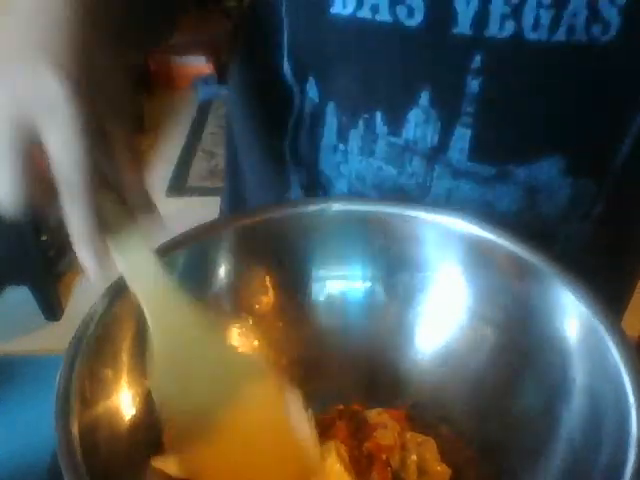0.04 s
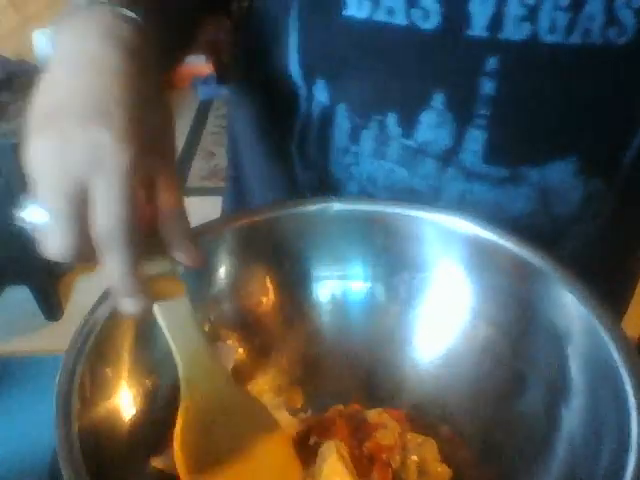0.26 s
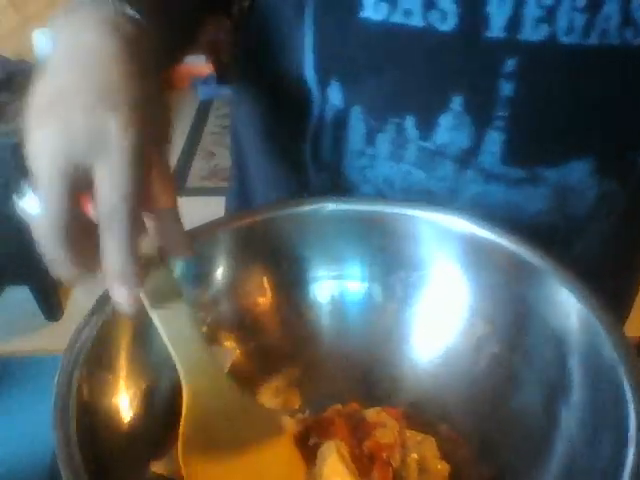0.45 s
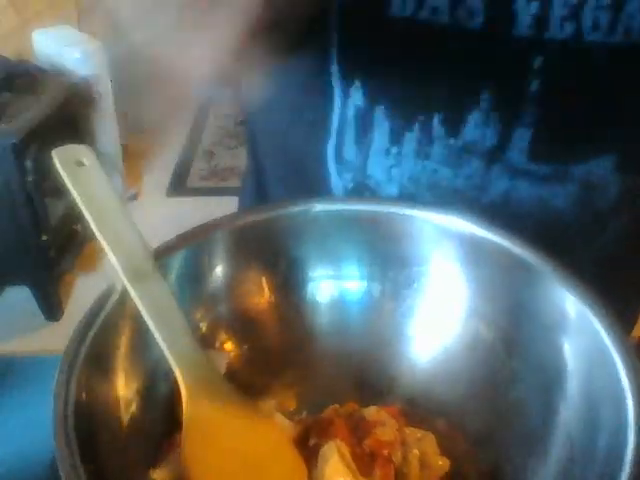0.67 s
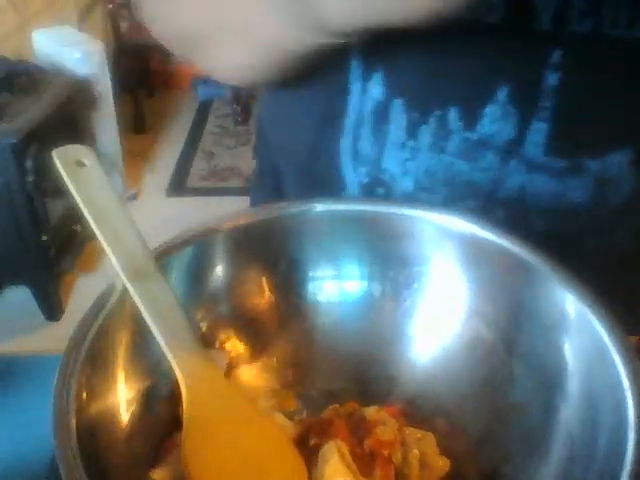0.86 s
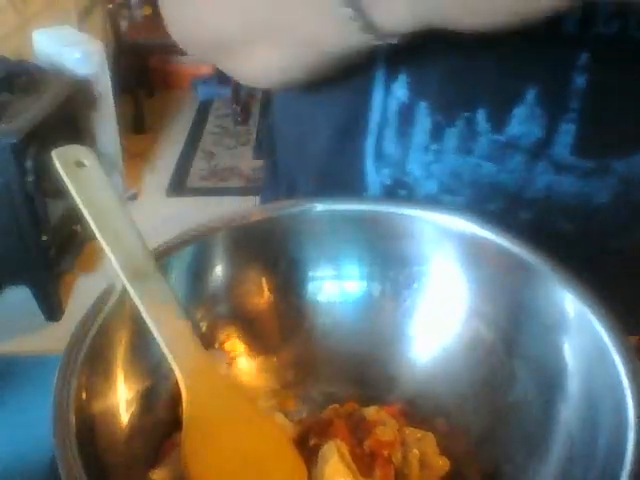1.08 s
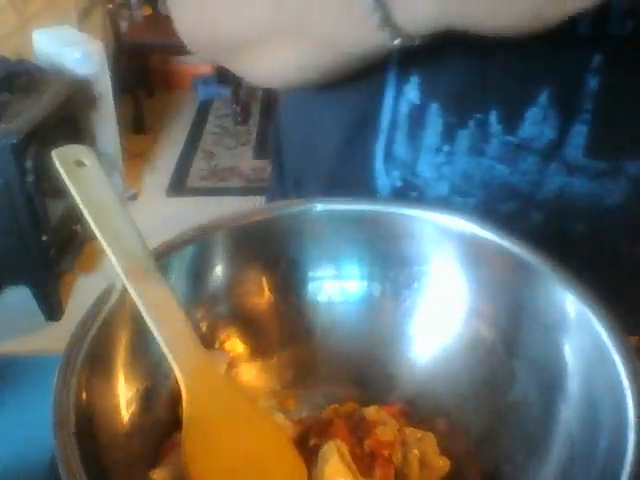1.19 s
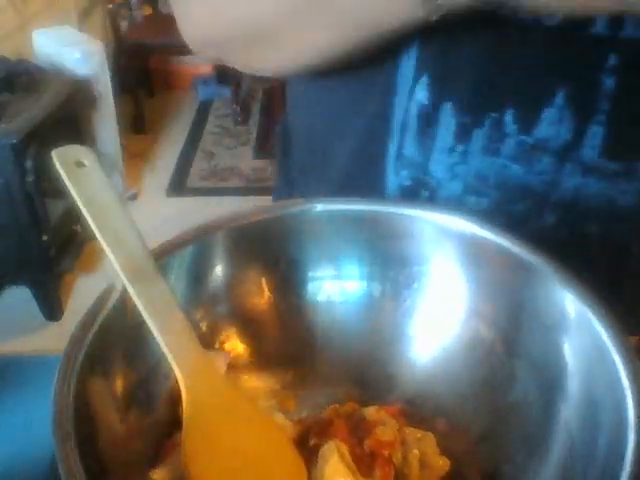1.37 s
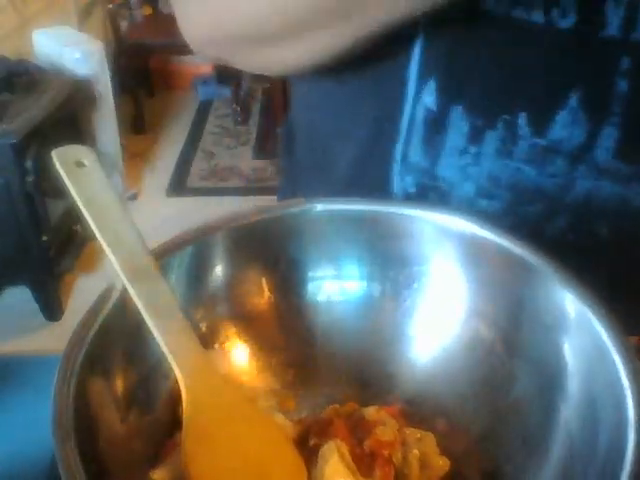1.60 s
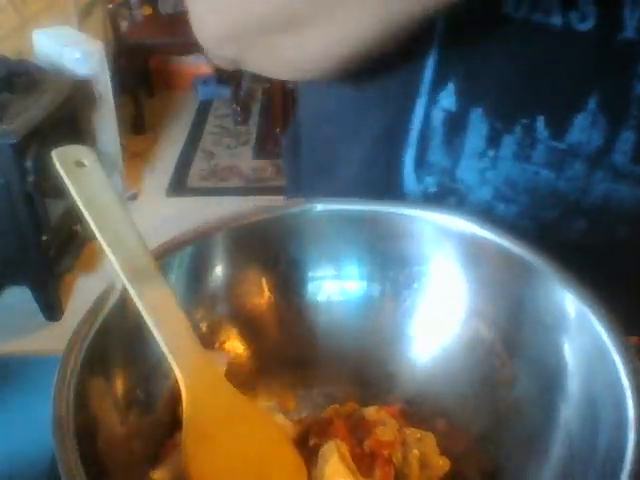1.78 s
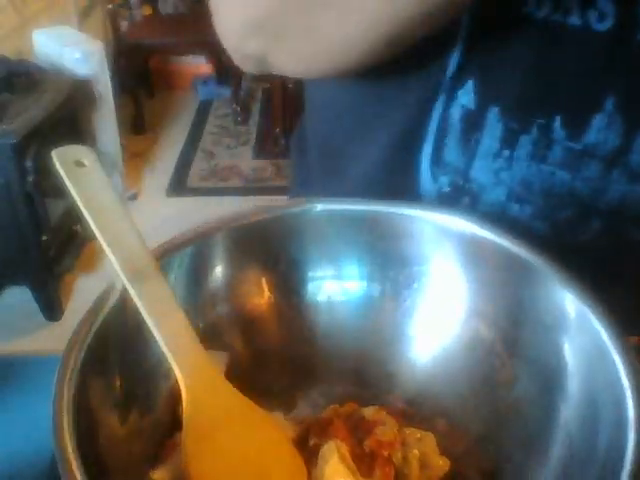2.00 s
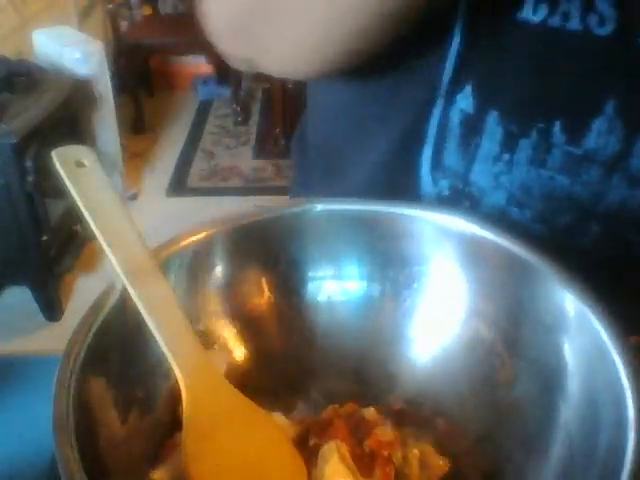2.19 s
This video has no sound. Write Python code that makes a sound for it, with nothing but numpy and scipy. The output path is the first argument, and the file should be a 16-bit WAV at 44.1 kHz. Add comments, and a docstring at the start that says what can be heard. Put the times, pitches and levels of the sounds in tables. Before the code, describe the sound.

A steel mixing bowl clangs under food and a spoon, rings on, then plastic crinkles nearby.

```python
"""A steel mixing bowl clangs close by as food and a wooden spoon land in it; then its rim rings on.
Each blow is a short clatter that sets off decaying modes; rocking adds bumps and a brief hum.
The food thuds as shaped noise, and the spoon scrapes as tiny slips that ring the bowl's wall.
Beside it a container is handled: dry knocks with short modes, and a crinkle of plastic made of clicks.
A short diffuse kitchen tail follows every source, over a faint rumble and hiss of noise."""
import sys
import numpy as np
from scipy import signal
from scipy.fft import rfft, irfft
from scipy.io import wavfile

SR = 44100
rng = np.random.default_rng(int(sys.argv[2]) if len(sys.argv) > 2 else 0)


def transcribe(u):
    """Save the signal u as a 16-bit wav file named by the first command-line argument.

    u: samples, shape (n,) or (channels, n), limited to [-1, 1]; the rate is SR.
    q: integer samples, one column per channel.
    """
    v = np.clip(np.atleast_2d(u).T, -1, 1)
    q = np.round(v * 32767).astype(np.int16)
    wavfile.write(sys.argv[1], SR, q)


N = 99225
TIME = np.arange(N) / SR
CUTOFF_HZ = 16200

# Ringing modes of the bowl: the wall is damped by the food, the rim rings long.
# Each row: frequency in Hz, level in dB, time to fall 60 dB in s (before any later damping).
BOWL_MODES = [ (402, -51, .36), (503, -41, .15), (912, -51.5, 0.24), (1082, -56, 0.6), (1220, -52.5, .16),
              (1327, -46.5, 0.16), (1380, -78.5, 1.6), (1428.6, -37, 0.09), (1517, -54.5, .15),
              (1653, -70.5, 2.4), (1738, -43.5, .15), (1970, -65.5, 1), (2347, -69.5, 2.96),
              (2468, -48, 0.44), (2671, -33, .23), (2760, -63, 2.3), (2947, -44, .3), (3058, -29, .17),
              (3155, -72.5, 1.1), (3542, -44, .25), (3950, -52.5, 1.2), (4127, -30, 0.11), (4300, -56, 1.6),
              (4577, -62.5, 1.6), (4759, -38, .2), (4824, -52, 1.2), (5090, -56.5, 2.4), (5304, -51, .6),
              (5354, -34, 0.097), (5900, -58, .5), (6080, -66, .8), (6450, -38, .22)]


def amp(db):
    """Decibels to gain."""
    return 10 ** (np.asarray(db) / 20)


def unit(x):
    """Scales to rms 1."""
    return x / np.sqrt(np.mean(x ** 2) + 1e-20)


def decay(t60):
    """An envelope that falls 60 dB in t60 seconds."""
    return np.exp(-np.log(1000) * TIME / t60)


def over_hz(points, hz):
    """Reads (Hz, value) points on a log-frequency axis."""
    point_hz, value = np.transpose(points)
    return np.interp(np.log(hz + 1), np.log(point_hz + 1), value)


def add(mix, start_s, sound):
    """Mixes a sound in at start_s seconds, cut at the end of the mix."""
    part = mix[round(start_s * SR):]
    part += sound[:len(part)]


def coloured(x, points, size=4096):
    """Causal minimum-phase filter with the given (Hz, dB) curve."""
    hz = abs(np.fft.fftfreq(size, 1 / SR))
    log_gain = np.log(amp(over_hz(points, hz)))
    # the Hilbert transform of the log gain supplies the minimum phase
    response = np.exp(np.conj(signal.hilbert(log_gain)))
    taps = np.fft.ifft(response).real
    return signal.oaconvolve(x, taps[:size // 2])[:N]


def band_curve(bands_hz, colour, sub_db=-20, top_db=-12):
    """A colour given at some bands, falling away below and above them."""
    bottom = (20, colour[0] + sub_db)
    top = (CUTOFF_HZ, colour[-1] + top_db)
    return [bottom, *zip(bands_hz, colour), top]


def at_level(x, points):
    """Makes a sound follow an (s, dB) curve; silent outside it."""
    s, db = np.transpose(points)
    inside = (TIME >= s[0]) * (TIME <= s[-1])
    return unit(x) * amp(np.interp(TIME, s, db)) * inside


def ring(modes):
    """Free ringing: a decaying sine for each (Hz, dB, t60) mode."""
    return sum(amp(db) * decay(t60) * np.sin(2 * np.pi * hz * TIME) for hz, db, t60 in modes)


def even_noise(size=256):
    """Noise whose short-time spectrum is kept fairly even, like many crowded modes."""
    x = rng.standard_normal(N)
    for _ in range(2):
        spectrum = signal.stft(x, nperseg=size)[2]
        # keep the phases, level every magnitude
        x = signal.istft(np.exp(1j * np.angle(spectrum)), nperseg=size)[1][:N]
    return x


def contact(click_db, t60, half_s=1e-5):
    """A brief push at the start of a dense, quickly dying clatter."""
    clatter = even_noise() * decay(t60)
    push = np.exp(-(TIME / half_s - 2) ** 2)
    return clatter / np.linalg.norm(clatter) + amp(click_db) * push / push.sum()


def grains(per_s, spread_db):
    """Tiny clicks of uneven size and random sign at random moments."""
    spread = np.minimum(rng.exponential(1, N), 4)
    sizes = amp(spread_db * spread) * rng.choice([-1, 1], N)
    return sizes * (rng.random(N) < per_s / SR)


def background():
    """Two filtered noises: a steady low room rumble and a thin hiss that swells and sinks."""
    # Spectra of the rumble and the hiss. Each row: frequency in Hz, relative level in dB per Hz.
    rumble_colour = [(20, -9), (50, 0.5), (110, 0.5), (190, 4), (300, -5), (600, -11.5), (1500, -16.5),
                     (4000, -24.5), (16000, -41.5)]
    hiss_colour = [(20, -17.5), (4000, -5.5), (7500, -6.5), (9800, 4), (11500, -7), (14000, 6), (16000, -5)]
    # Swell of the hiss. Each row: time in seconds, level in dB.
    hiss_level = [(0, -87), (.14, -78), (.18, -67), (.55, -65.5), (.75, -72.5), (1.12, -73.5), (1.2, -69),
                  (1.45, -74.5), (1.65, -64), (1.85, -75), (2.02, -69), (2.25, -77)]
    rumble_db = -72.5
    rumble, hiss = rng.standard_normal((2, N))
    hiss_gain = amp(np.interp(TIME, *np.transpose(hiss_level)))
    rumble = amp(rumble_db) * unit(coloured(rumble, rumble_colour))
    return rumble + hiss_gain * unit(coloured(hiss, hiss_colour))


def wavering(size=2048):
    """A gain that drifts at random around 1, from low-passed noise."""
    waver_db, waver_hz = 1.7, 20  # rms depth, speed limit
    hz = np.fft.rfftfreq(size, N / SR / size)
    spectrum = rfft(rng.standard_normal(size)) / (1 + (hz / waver_hz) ** 2)
    drift = unit(irfft(spectrum))
    return amp(waver_db * np.interp(np.arange(N) / N, np.arange(size) / size, drift))


def shimmer(count=90):
    """A crowd of weak modes scattered between the bowl's strong ones."""
    # Strength of the crowd. Each row: frequency in Hz, level of each mode in dB.
    shimmer_level = [(700, -74), (1500, -81), (2100, -70), (3300, -75.5), (4500, -64.5), (5300, -64.5),
                     (6200, -67), (7000, -76)]
    # Ringing time of the crowd. Each row: frequency in Hz, time to fall 60 dB in s.
    shimmer_t60 = [(700, 0.17), (1600, 0.86), (3300, .8), (4500, 0.42), (5300, 0.82), (7000, 0.41)]
    edges = np.linspace(shimmer_level[0][0], shimmer_level[-1][0], count + 1)
    hz = edges[:-1] + rng.random(count) * np.diff(edges)
    modes = zip(hz, over_hz(shimmer_level, hz), over_hz(shimmer_t60, hz))
    signs = rng.choice([-1, 1], count)
    return sum(sign * ring([mode]) for sign, mode in zip(signs, modes))


def bowl():
    """Each blow clatters and rings the steel's modes, with its own balance of thump, clang and ring."""
    # Centres of a blow's colour in Hz: thump, low, body, clang, hollow, ring, edge, air.
    bands_hz = [90, 380, 850, 1500, 2100, 3400, 6300, 9500]
    # Blows on the bowl. Each row: start in seconds, contact click in dB, ringing in dB,
    # clatter time to fall 60 dB in s, colour in dB at the bands above.
    blows = [ (0.16, -20.5, -8, .19, (6.5, -5, 2.5, -11.5, -4, 4, 4.5, -17.5)),
             (0.2293, -2, -18, 0.089, (-2.5, 9.5, 19.5, 2.5, -9.5, -8.5, -14.5, -20.5)),
             (.2697, -9.5, -20.5, .045, (-2, 3, -3.5, 21.5, -11.5, 16.5, -21.5, -27)),
             (0.2982, -10, -9.5, 0.088, (2.5, 5, 7.5, 1, -10, -11, -18.5, -27)),
             (0.4783, -7, 0.5, 0.16, (11.5, 11, 16, 23.5, 9, 14, 5.5, -22.5))]
    twin_hz, twin_share = 2, 0.072  # twin's offset in Hz, its share of the mode's amplitude
    wood_contact_s = .00006  # half-length of the spoon's contact with the steel
    damped_s, damped_fade_s = 1.41, 0.48  # start and time constant of the extra damping

    modes = shimmer()
    for hz, db, t60 in BOWL_MODES:
        # the bowl is not quite round: each mode beats with a close twin
        twin = twin_share * ring([(hz + twin_hz, db, t60)])
        modes += wavering() * (ring([(hz, db, t60)]) - twin)

    out = np.zeros(N)
    for start_s, click_db, ring_db, t60, colour in blows:
        blow = contact(click_db, t60, wood_contact_s) + amp(ring_db) * modes
        add(out, start_s, coloured(blow, band_curve(bands_hz, colour)))
    # the last of the ring dies faster
    return out * np.exp(-np.maximum(TIME - damped_s, 0) / damped_fade_s)


def food_and_spoon():
    """The food settles with a thud while the spoon slides down the steel in tiny slips that ring the wall."""
    # Swell of the thud, then of the scrape. Each row: time in seconds, level in dB.
    thud_level = [(.16, -72), (.19, -50.5), (.225, -48), (.26, -49), (.3, -51.5), (.35, -73.5)]
    scrape_level = [(.17, -81.5), (.205, -40.5), (.225, -42.5), (.26, -44), (.3, -47), (.34, -56.5),
                    (.38, -64.5), (.41, -65.5), (.437, -50), (0.462, -63.5), (.48, -84.5)]
    # Tone of the thud, then of the scrape. Each row: frequency in Hz, gain in dB.
    thud_colour = [(20, -15.5), (45, -10), (75, 2.5), (120, -7), (200, -16.5), (500, -39), (2000, -70)]
    scrape_colour = [(100, -10.5), (600, 6.5), (1400, 4), (2000, -8.5), (2600, 0.5), (3600, -1.5),
                     (5400, -15.5), (6250, -0.5), (7500, -2), (10000, -19), (16000, -20.5)]
    wall_db, wall_t60 = 3.5, .12  # how strongly and how long (s) the slips ring the wall

    thud = at_level(coloured(even_noise(size=2048), thud_colour), thud_level)
    slips = grains(per_s=3000, spread_db=-3)
    wall = ring([(hz, db, wall_t60) for hz, db, _ in BOWL_MODES])
    scrape = slips + amp(wall_db) * signal.fftconvolve(slips, wall)[:N]
    return thud + at_level(coloured(scrape, scrape_colour), scrape_level)


def bowl_base():
    """The bowl bumps as it rocks on the counter; tipped by the spoon, it hums until it sits flat."""
    # Modes of the hum. Each row: frequency in Hz, level in dB, time to fall 60 dB in s (before seating).
    hum_modes = [(135, -54.5, 1.6), (757, -39.5, .75), (2467, -54, .9)]
    # Bumps of the rocking base. Each row: start in seconds, level in dB.
    rocks = [(0.2597, -7.5), (0.482, -4.5), (0.4962, -2.5), (0.5074, 0.5), (0.518, -5)]
    # Tone of a bump. Each row: frequency in Hz, gain in dB.
    rock_colour = [(30, -12), (80, 4), (250, 4), (600, 11.5), (1400, -0.5), (2200, -12), (6000, -20),
                   (16000, -44)]
    tipped_s, seated_s, seat_fade_s = .298, .5, .03  # hum starts, fade starts, fade time constant

    out = np.zeros(N)
    add(out, tipped_s, ring(hum_modes))
    out *= np.exp(-np.maximum(TIME - seated_s, 0) / seat_fade_s)
    for start_s, db in rocks:
        bump = contact(click_db=-3.0, t60=.035)
        add(out, start_s, amp(db) * coloured(bump, rock_colour))
    return out


def container():
    """Dry knocks with a short hollow ring, two of them led in by a faint, soft sound made the same way."""
    # Centres of the colour, in Hz.
    bands_hz = [150, 1000, 2200, 2900, 3600, 4250, 4900, 6500, 11000]
    # Knocks, two with a faint soft lead-in row just before them. Each row: start in seconds,
    # click in dB, clatter time to fall 60 dB in s, colour in dB at the bands above.
    knocks_and_lead_ins = [ (1.171, -11, 0.12, (-16.5, -14, -8.5, -11, -1, -2, -11, -5.5, -33)),
                           (1.1766, 5.5, 0.039, (-21, -5.5, 4, 1, 9, 7.5, -24.5, -14, -40)),
                           (1.6799, -12.5, 0.059, (-32, -24, -7, -15, -4.5, -4.5, -19, -16.5, -33.5)),
                           (2.2025, -19, .12, (-48, -27, -16, -39, -42, -30, -23, -35, -33)),
                           (2.2154, -4.5, 0.053, (-39, -12.5, -1.5, -2.5, -16, -6, -14, -14, -33.5))]
    # Hollow ring. Each row: frequency in Hz, level in dB, time to fall 60 dB in s.
    container_modes = [(793, -34, 0.14), (876, -33, .07), (1541, -36.5, 0.078), (1864, -42, 0.073),
                       (2385, -36, .05), (2605, -39, 0.078), (3130, -48, .04)]

    out = np.zeros(N)
    modes = ring(container_modes)
    for start_s, click_db, t60, colour in knocks_and_lead_ins:
        sound = contact(click_db, t60) + modes
        add(out, start_s, coloured(sound, band_curve(bands_hz, colour)))
    return out


def plastic():
    """Bright snaps, each a click and a short clatter, over a rustle of tiny creases."""
    # Snaps. Each row: start in seconds, level in dB, sharp click in dB, treble tilt in dB.
    snaps = [(1.5356, -25.5, -14, 3), (1.5754, -18.5, -0.5, 15), (1.5789, -15, -3, 0),
             (1.6034, -12.5, -3, 7), (1.6096, -19, -8, 0), (1.624, -9, -19, -18), (1.6311, -6.5, -1, -13),
             (1.6348, -9.5, -21, -17), (1.6653, -13, -15, -12), (1.9688, -18.5, 5.5, 0),
             (1.9922, -32.5, -3, 6), (2.0205, -29, -5, -5)]
    # The two frequencies in Hz between which a snap's treble tilts.
    tilt_hz = [6900, 15200]
    # Tone of the plastic. Each row: frequency in Hz, gain in dB.
    snap_colour = [(100, -49), (700, -18), (2000, -14.5), (3500, -10.5), (5000, -9.5), (7000, 0),
                   (9000, -11.5), (12000, -20), (16000, -19)]
    # Swell of the rustle. Each row: time in seconds, level in dB.
    rustle_level = [(1.49, -78), (1.55, -69), (1.6, -62), (1.633, -52), (1.69, -67), (1.75, -81),
                    (1.84, -82), (1.96, -89.5), (1.975, -58.5), (2.03, -65.5), (2.12, -87), (2.25, -66)]

    crackle = np.zeros(N)
    for start_s, db, click_db, tilt_db in snaps:
        tilt = [(tilt_hz[0], db), (tilt_hz[1], db + tilt_db)]
        add(crackle, start_s, coloured(contact(click_db, t60=0.066), tilt))
    creases = coloured(grains(per_s=27000, spread_db=4), snap_colour)
    return coloured(crackle, snap_colour) + at_level(creases, rustle_level)


def kitchen(x, size=256):
    """A short diffuse tail of decaying noise, each band dying at its own speed."""
    # Decay of the room. Each row: frequency in Hz, time to fall 60 dB in s.
    room_t60 = [(100, .3), (500, 0.43), (2000, 0.25), (6000, .32), (15000, 0.32)]
    room_db, room_rise_s = -16.5, 0.0066  # level of the tail, time over which it builds up
    hz, t, spectrum = signal.stft(even_noise(), SR, nperseg=size)
    fade = np.exp(-np.log(1000) * t / over_hz(room_t60, hz)[:, None])
    tail = signal.istft(spectrum * fade, SR, nperseg=size)[1][:N]
    tail *= np.minimum(TIME / room_rise_s, 1) ** 2
    return amp(room_db) * signal.fftconvolve(x, tail / np.linalg.norm(tail))[:N]


def scene():
    """All sources in the kitchen, in mono."""
    near = bowl() + food_and_spoon() + bowl_base() + container() + plastic()
    return (near + kitchen(near) + background())[None]


def record(dry, ceiling=0.72):
    """Soft overload, strongest on the loudest peaks, then the band limit."""
    low_pass = signal.firwin(511, CUTOFF_HZ, window=("kaiser", 9), fs=SR)
    overloaded = ceiling * np.tanh(dry / ceiling)
    return signal.oaconvolve(overloaded, low_pass[None], "same")


dry = scene()
out = record(dry)
transcribe(out)
```